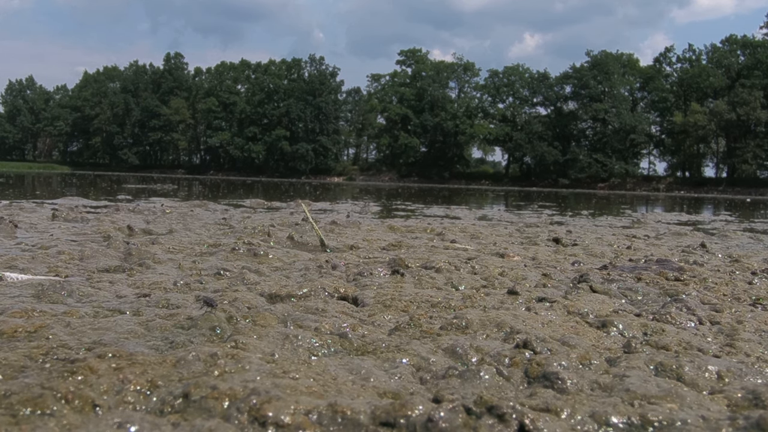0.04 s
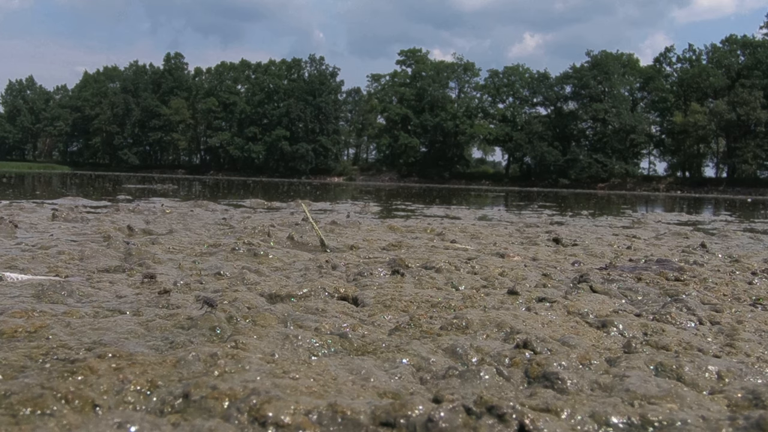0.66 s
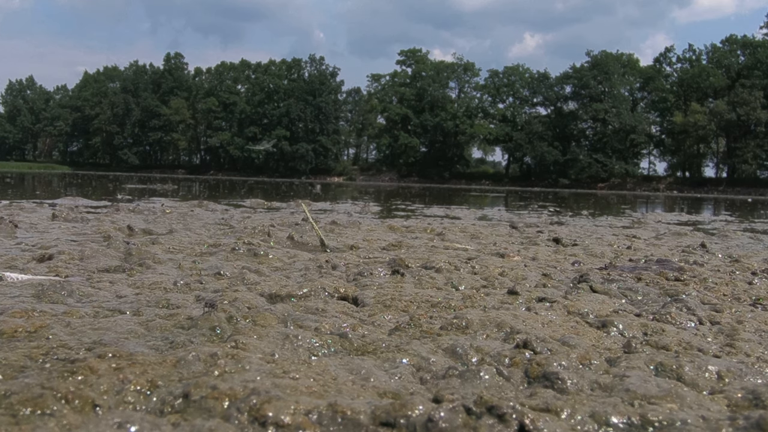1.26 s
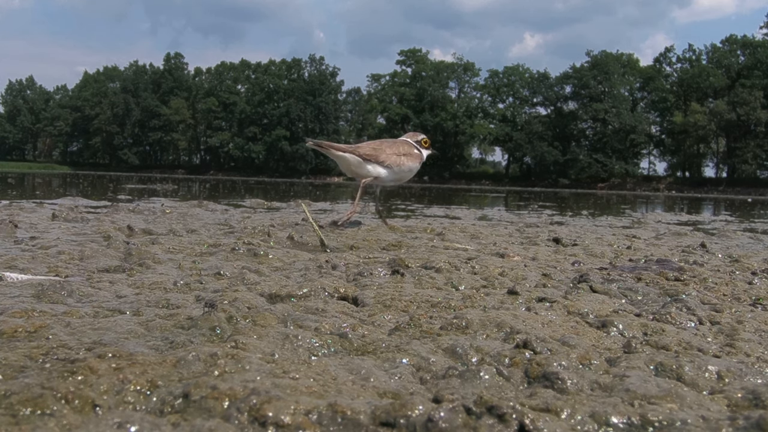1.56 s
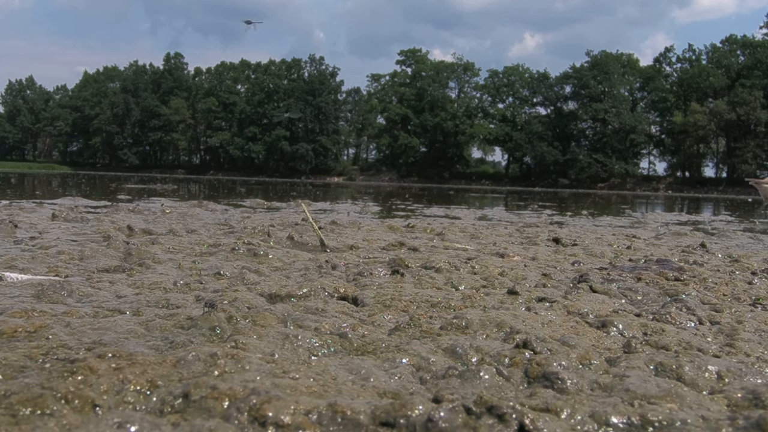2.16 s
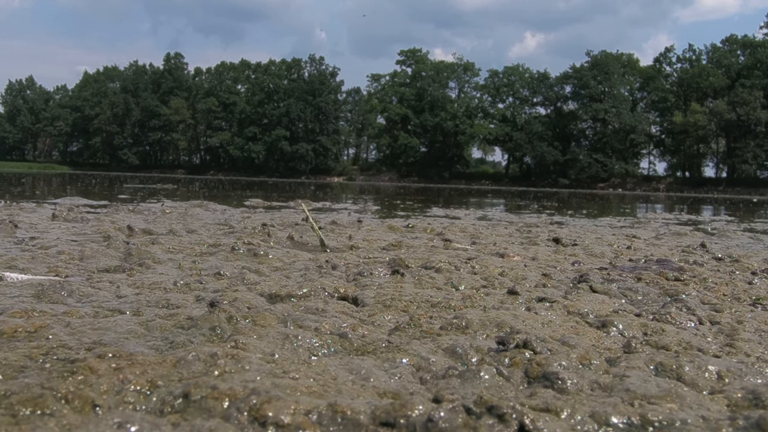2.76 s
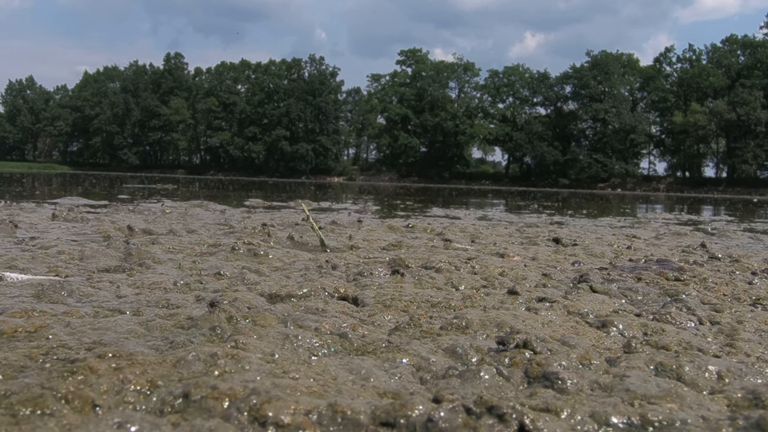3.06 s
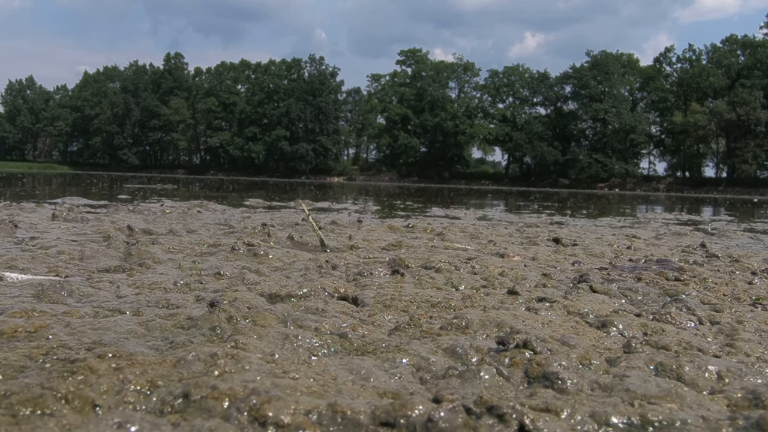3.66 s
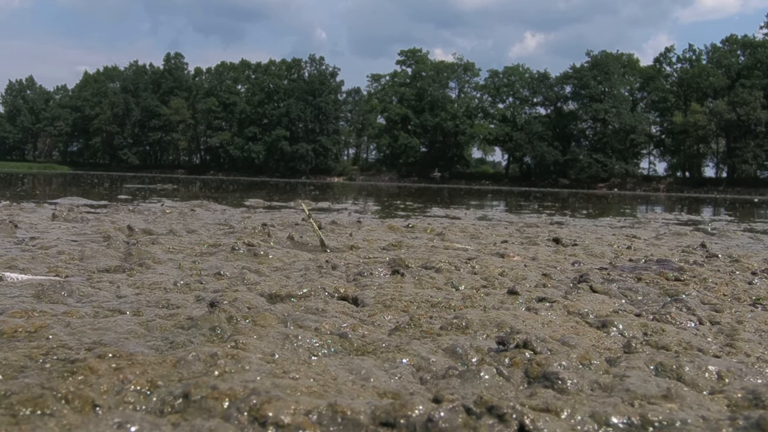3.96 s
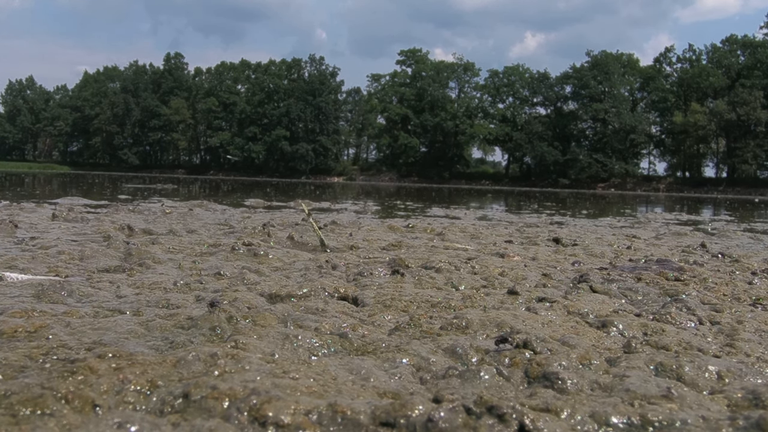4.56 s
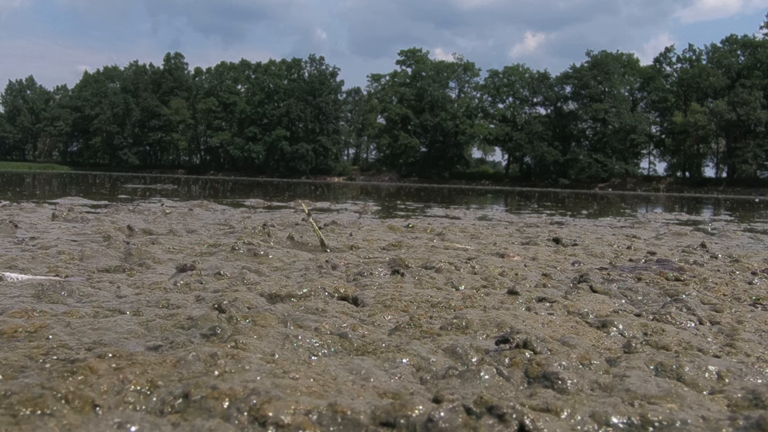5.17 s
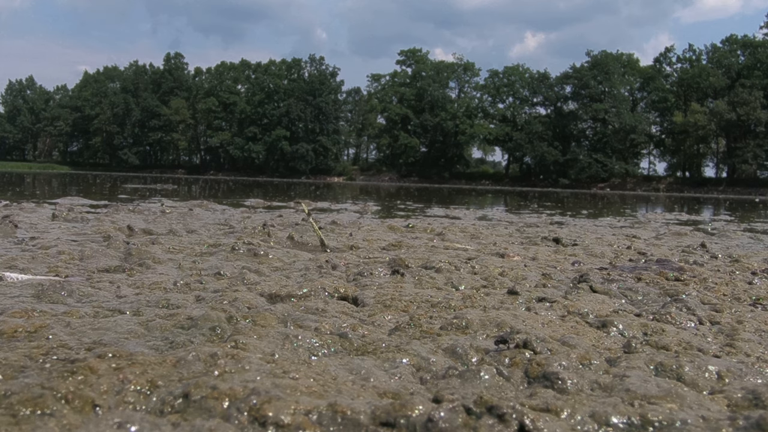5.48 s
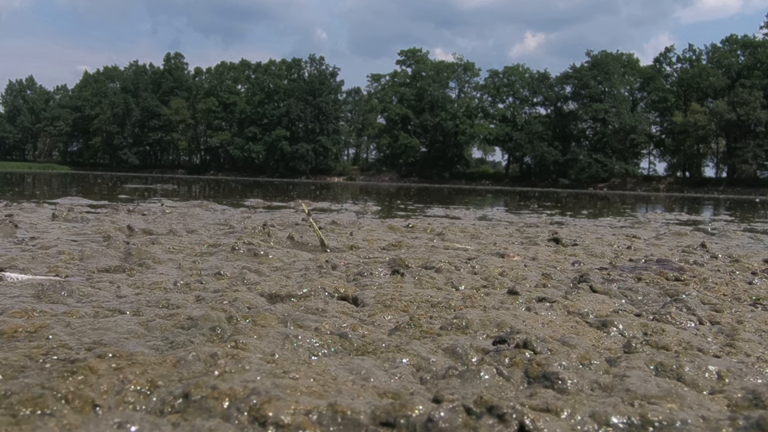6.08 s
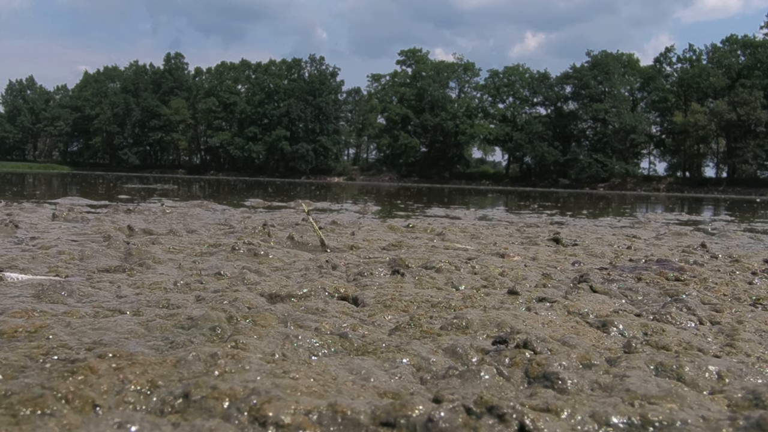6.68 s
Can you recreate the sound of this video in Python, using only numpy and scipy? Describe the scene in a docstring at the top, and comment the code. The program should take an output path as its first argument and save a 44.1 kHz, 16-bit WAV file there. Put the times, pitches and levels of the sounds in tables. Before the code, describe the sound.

Faint songbirds trill and twitter from trees across a lake, over soft air and a low distant rumble. A few tiny ticks and light scuffing come as a small bird runs over mud. Past the middle, a plover close to the microphone on the right gives one short, clear, falling whistle, far louder than everything else. A distant wader calls softly around it, and the quiet chirping carries on.

```python
"""A plover on a muddy lake shore

A plover gives one falling whistle close by on the right, a nearly pure tone shaped by its throat.
A far wader calls, and songbirds twitter in frequency-modulated tones that echo from the trees
across the water. Damped ticks and faint scuffing lie over distant rumble, soft air and equipment hum."""
import sys
import numpy as np
from scipy import signal
from scipy.fft import rfft, irfft, next_fast_len
from scipy.io import wavfile
from scipy.ndimage import uniform_filter1d, map_coordinates

SR = 44100
rng = np.random.default_rng(int(sys.argv[2]) if len(sys.argv) > 2 else 0)


def digitize_waveform(pressure):
    """Quantize a signal to 16-bit integers and store it at the path in sys.argv[1].

    Rows of a 2-D input are taken as channels; values are limited to [-1, 1].
    """
    field = np.atleast_2d(pressure).T
    bounded = np.clip(field, -1, 1)
    quanta = np.round(bounded * 32767).astype(np.int16)
    wavfile.write(sys.argv[1], SR, quanta)


N = 301203

# Noise spectra in the sum (mid) and difference (side) channels: (frequency [Hz], relative density [dB])
RUMBLE_MID_SPECTRUM = [(20, -24), (116, -21), (141, -2), (175, 0), (220, -6), (270, -17), (380, -38),
                       (900, -80)]
RUMBLE_SIDE_SPECTRUM = [(20, -26), (116, -22), (141, -3), (183, 0), (228, -4), (275, -15), (380, -34),
                        (900, -80)]
AIR_MID_SPECTRUM = [(20, 8), (110, 5.5), (255, 17), (400, 7.5), (520, -0.5), (750, 6), (1100, -2),
                    (1900, -4), (2600, -7), (5000, -6.5), (7000, -4.5), (8400, -18), (12500, -25.5),
                    (15000, -34.5)]
AIR_SIDE_SPECTRUM = [(20, 2.5), (110, 8), (260, 23.5), (400, 9.5), (520, 8), (800, 16.5), (1100, 7),
                     (1450, 5.5), (2600, -8), (5000, -13), (7000, -3.5), (8400, -19), (12500, -24),
                     (15000, -38)]
# Partials of the hum: (frequency [Hz], level [dB])
HUM_PARTIALS = [(59.94, -75), (179.8, -67.5)]
# Spectral envelope of the buzz: (frequency [Hz], line level [dB])
BUZZ_ENVELOPE = [(5300, -112), (5800, -94), (6200, -124.5), (6700, -88.5), (7100, -95.5), (7600, -104)]
# Spectrum of scuffed mud: (frequency [Hz], relative density [dB])
SCUFF_SPECTRUM = [(300, -13), (600, -8.5), (1400, 1.5), (2500, -9), (6000, -2.5), (9000, -20), (13000, -33),
                  (15000, -29.5)]
# Songbird trills: (time [s], duration [s], start pitch [Hz], middle pitch [Hz], end pitch [Hz],
# level [dB], warble depth [Hz], left minus right [dB])
TRILL_NOTES = [(0.149, .425, 5140, 3660, 3090, -68.5, 145, 4.5),
               (.685, 0.35, 5000, 3790, 2810, -69, 145, 5), (1.084, 0.12, 4270, 4400, 4680, -75, 110, 2),
               (1.188, .096, 3090, 3320, 3470, -74, 250, 1), (1.276, .14, 3620, 2890, 2870, -69.5, 300, -1),
               (1.993, 0.076, 4600, 3500, 3200, -71.5, 395, 2),
               (2.101, .11, 3350, 2750, 2670, -73.5, 250, 1), (2.35, .074, 5800, 4860, 4340, -70.5, 450, 2),
               (2.63, 0.12, 4570, 3750, 2900, -72.5, 240, 1.5),
               (3.06, 0.089, 3910, 3170, 2610, -77, 220, -1),
               (3.483, .14, 5700, 4430, 4030, -70.5, 330, -2),
               (3.857, 0.054, 4000, 3550, 3420, -76.5, 200, -4),
               (5.231, .11, 4500, 3570, 2740, -76.5, 220, 1), (5.594, 0.091, 4290, 3690, 2870, -71, 240, 0),
               (6.574, .17, 4350, 3190, 2430, -73.5, 180, 0)]
# Ticks, soft knocks and one short high chip: (time [s], level [dB], centre frequency [Hz], width [octaves])
TICK_EVENTS = [(.588, -55.5, 400, 0.7), (0.5998, -46.5, 3170, 0.77), (.6, -57, 296, 0.48),
               (0.6032, -52.5, 1550, 0.39), (1.2644, -56, 2050, 0.57), (1.6965, -51, 3900, .32),
               (1.7074, -56, 3500, 0.29), (1.76, -49, 5240, .47), (1.9195, -47.5, 6660, 0.16),
               (4.328, -56, 1100, .75), (4.7446, -51.5, 5200, 0.56)]
# Bouts of hoarse chirps: (centre of first chirp [s], end of bout [s], first level [dB])
CHIRP_BOUTS = [(1.322, 2.23, -67.5), (4.644, 5.38, -66.5)]
# Songbird slides: (time [s], duration [s], start pitch [Hz], end pitch [Hz], level [dB])
SLIDE_NOTES = [(1.297, .014, 4550, 5260, -66), (1.513, 0.028, 4070, 5260, -64.5),
               (1.564, 0.072, 5900, 3020, -66), (1.71, 0.014, 3700, 3100, -70),
               (1.73, 0.0096, 4250, 4500, -56.5), (1.744, 0.01, 4700, 5400, -62),
               (1.779, .044, 6210, 4050, -58.5), (1.826, .032, 3920, 3060, -66.5),
               (3.455, 0.024, 4360, 4520, -71), (3.767, .029, 5600, 5100, -74),
               (3.837, 0.038, 6530, 5420, -74.5), (4.868, 0.028, 6500, 5570, -67.5)]
# One bird's peeps: (time [s], level [dB])
PEEP_NOTES = [(2.755, -68.5), (3.11, -69.5), (4.157, -73.5), (5.175, -69), (5.546, -74.5)]
# Far wader: (time [s], duration [s], start pitch [Hz], middle pitch [Hz], end pitch [Hz], level [dB])
WADER_NOTES = [(4.041, 0.087, 2030, 2000, 1820, -68), (4.19, 0.093, 2380, 2330, 2270, -73),
               (4.813, 0.12, 1980, 2140, 2010, -66.5), (4.895, 0.09, 2050, 1830, 2070, -63.5),
               (4.981, 0.16, 2100, 2253, 2180, -72), (5.23, 0.079, 1720, 2025, 1860, -65)]
# Catches of the plover's voice before it whistles: (time [s], duration [s], pitch [Hz], level [dB])
VOICE_CATCHES = [(4.3456, 0.002, 2110, -35.5), (4.3548, 0.0052, 2540, -27.5)]
# The whistle falters, holds, then sinks as it grows louder: (time [s], pitch [Hz], level [dB])
WHISTLE_CONTOUR = [(4.3637, 2413, -27), (4.3715, 2518, -33), (4.375, 2386, -28.3), (4.422, 2370, -28),
                   (4.452, 2263, -25), (4.497, 2058, -24.5), (4.53, 1952, -24.5), (4.552, 1885, -26),
                   (4.56, 1640, -32)]
# Response of the plover's throat, with a resonance near 7 kHz: (frequency [Hz], gain [dB])
THROAT_RESPONSE = [(700, -18), (1100, -2), (1400, 0), (2550, 0), (3750, -28), (4100, -21), (4750, -11),
                   (5800, -26), (6500, -11), (7200, -4), (8600, -16), (9400, -29), (12200, -23),
                   (14500, -32)]
# Air hissing along with the whistle: (frequency [Hz], relative density [dB])
BREATH_SPECTRUM = [(1200, -24), (2500, -15), (2820, 2), (3150, -24), (4500, -25), (5500, -25.5),
                   (6300, -17), (8000, -43), (14000, -52)]
# Response of the whistle on the left, relative to the right, with a notch where a ground reflection interferes:
# (frequency [Hz], gain [dB])
LEFT_RESPONSE = [(1400, -7), (1860, -10), (1940, -14), (2000, -23), (2170, -15), (2400, -10.5), (4700, -7),
                 (6000, 5), (7200, 0), (8000, -4), (11000, 1)]
# Later arrival of the whistle on the left: (frequency [Hz], phase delay [s])
LEFT_DELAY = [(1950, .00044), (2050, .00032), (2400, .00026), (4000, .000205)]


def amp(db):
    """Amplitude grows tenfold for every 20 dB."""
    return 10 ** (np.asarray(db) / 20)


def unit(x):
    """Normalisation to an rms of 1."""
    return x / np.sqrt(np.mean(x ** 2) + 1e-20)


def along(points, hz):
    """Interpolation of (frequency, value) points on a logarithmic frequency axis."""
    frequencies, values = np.transpose(points)
    return np.interp(np.log(hz + 1), np.log(frequencies + 1), values)


def wobble(rate, size=N):
    """Smooth random modulation: a spline through `rate` Gaussian values a second."""
    knots = rng.standard_normal(int(size * rate / SR) + 4)
    return map_coordinates(knots, [np.arange(size) * rate / SR])


def filtered(x, response):
    """Linear filtering: the spectrum is multiplied by a frequency response."""
    size = x.shape[-1]
    padded = next_fast_len(size + 8192)
    return irfft(rfft(x, padded) * response(np.fft.rfftfreq(padded, 1 / SR)), padded)[..., :size]


def phase_of(hz):
    """Phase is the time integral of frequency."""
    return 2 * np.pi * np.cumsum(hz) / SR


def add(track, s, sound, pan_db=0):
    """Superposition at time s, with the left channel pan_db above the right."""
    start = max(0, round(s * SR))
    part = (sound * amp([[pan_db / 2], [-pan_db / 2]]))[:, :N - start]
    track[:, start:start + part.shape[1]] += part


def coloured_noise(spectrum):
    """White noise takes on the spectrum of its filter."""
    return filtered(rng.standard_normal(N), lambda hz: amp(along(spectrum, hz)))


def stereo_noise(mid_spectrum, side_spectrum):
    """Mid-side stereo from two independent noises, scaled so that the mid has rms 1."""
    mid, side = coloured_noise(mid_spectrum), coloured_noise(side_spectrum)
    return np.array([mid + side, mid - side]) / np.std(mid)


def note(length, pitches, warble_hz, warble_rate, flutter_db, edge):
    """Frequency modulation, warble_hz deep, of a tone arching through three pitches."""
    size = int(length * SR)
    progress = np.linspace(0, 1, size)
    cycle = phase_of(warble_rate * (1 + .07 * wobble(30, size)))
    rasp = (28 + .45 * warble_hz) * wobble(500, size)
    arch = np.polyval(np.polyfit([0, .5, 1], pitches, 2), progress)
    pitch = arch + 0.9 * warble_hz * np.sin(cycle) + rasp
    envelope = np.sin(np.pi / 2 * np.clip(np.minimum(progress, 1 - progress) / edge, 0, 1))
    # a deep warble breaks the tone into pulses, loudest on each downstroke
    pulsing_db = -5.5 * np.tanh((warble_hz / 130) ** 2) * np.cos(cycle)
    return unit(envelope * amp(pulsing_db + flutter_db * wobble(70, size)) * np.sin(phase_of(pitch)))


def tree_echo(x, t60, build_s):
    """Diffuse reflection from the trees: convolution with noise that builds, then decays."""
    t = np.arange(SR) / SR
    tail = rng.standard_normal((2, SR)) * amp(-60 * t / t60) * (1 - np.exp(-(t / build_s) ** 2))
    return signal.fftconvolve(x, tail / np.linalg.norm(tail[0]), axes=1)[:, :N]


def distant_rumble():
    """Low-frequency noise under slow amplitude modulation: it wavers, and swells once."""
    start_s, rise_s, hold_s, fall_s = 5.91, 0.2, 0.47, 0.46
    swell_db = np.interp(np.arange(N) / SR, np.cumsum([start_s, rise_s, hold_s, fall_s]), [0, 7.5, 7.5, 0])
    gain = amp(-61 + swell_db + 1.5 * wobble(8))
    return gain * stereo_noise(RUMBLE_MID_SPECTRUM, RUMBLE_SIDE_SPECTRUM)


def soft_air():
    """Broadband noise, nearly stationary in level."""
    return amp(-65 + .4 * wobble(3)) * stereo_noise(AIR_MID_SPECTRUM, AIR_SIDE_SPECTRUM)


def equipment_hum():
    """A line spectrum: two wavering low partials and a thin buzz of high harmonics."""
    hum = sum(amp(db + 2.16 * wobble(6.9)) * unit(np.sin(phase_of(hz + 0.6 * wobble(4.05))))
              for hz, db in HUM_PARTIALS)
    t, harmonics_hz = np.arange(N) / SR, 119.88 * np.arange(46, 63)
    buzz = sum(amp(along(BUZZ_ENVELOPE, hz)) * unit(np.sin(2 * np.pi * (hz * t + rng.random())))
               for hz in harmonics_hz)
    return hum + buzz


def mud_scuffing():
    """Rapid random modulation makes noise crackle; it peaks as the plover runs past on the mud."""
    peak_s, peak_db, floor_db = 1.22, -64.5, -75.5
    rise_db_per_s, fade_db_per_s = 55, 5.5
    since_peak = np.arange(N) / SR - peak_s
    drop_db = np.maximum(-since_peak * rise_db_per_s, since_peak * fade_db_per_s)
    grains = amp(3 * wobble(45) + 3 * wobble(700))
    crackle = unit(grains * stereo_noise(SCUFF_SPECTRUM, SCUFF_SPECTRUM))
    return amp(np.maximum(peak_db - drop_db, floor_db)) * crackle


def stray_twitter(count=50):
    """From deep in the wood, the reverberant sound of random chirps outweighs the direct sound."""
    track = np.zeros((2, N))
    for when, height, slope, size in rng.random((count, 4)):
        hz = 3200 + 2500 * height
        pitches = [hz * (1 + .15 * slope), hz, hz * .95]
        chirp = note(.03 + .04 * size, pitches, warble_hz=120, warble_rate=60, flutter_db=2, edge=.3)
        add(track, when * N / SR, amp(-79 + 4 * size) * chirp)
    return .5 * track + tree_echo(track, t60=0.13, build_s=0.0068)


def trills(fade_db=0.8, near_db=-66.5):
    """Deep modulation makes notes buzz. Returns the direct sound and the share sent to the trees."""
    direct, to_trees = np.zeros((2, 2, N))
    for s, length, *pitches, db, warble_hz, pan_db in TRILL_NOTES:
        trill = note(length, pitches, warble_hz, warble_rate=50, flutter_db=1.1, edge=.1)
        trill *= amp(db + fade_db * np.linspace(.5, -.5, len(trill)))
        echo_db = -6.5 + .5 * (near_db - db)  # fainter birds are further off, so more reverberant
        add(direct, s, trill, pan_db)
        add(to_trees, s, amp(echo_db) * trill, pan_db)
    return direct, to_trees


def water_reflection(x, gain=.35, delay_s=.0009):
    """Interference of direct and reflected paths: a gliding note swells and dips."""
    return filtered(x, lambda hz: 1 + gain * np.exp(-2j * np.pi * hz * delay_s))


def ticks(decay_cycles=62, lead_samples=200):
    """Damped bursts of band noise: each falls 60 dB in decay_cycles, so low ones last longer."""
    track, t = np.zeros((2, N)), np.arange(SR // 10) / SR
    for s, db, centre_hz, octaves in TICK_EVENTS:
        def band(hz):
            bell = np.exp(-.5 * (np.log2((hz + 1) / centre_hz) / octaves) ** 2)
            return bell / np.sqrt(1 + hz / centre_hz + (hz / 7000) ** 7)

        t60 = decay_cycles / centre_hz
        noise = rng.standard_normal(len(t)) + 0.64 * rng.standard_normal((2, len(t)))
        decaying = np.pad(noise * amp(-60 * t / t60), ((0, 0), (lead_samples, 0)))
        burst = filtered(decaying, band) / np.std(filtered(noise, band))
        add(track, s - lead_samples / SR, amp(db) * burst, pan_db=2.5)
    return track


def hoarse_chirps(period_s=.166, length_s=.17, width_hz=250):
    """Narrow-band noise has a raspy pitch; through a bout each chirp is higher and louder."""
    track, size = np.zeros((2, N)), int(length_s * SR)
    for first, end, db in CHIRP_BOUTS:
        for k, s in enumerate(np.arange(first, end, period_s)):
            centre_hz = 4460 + 42 * k
            noise = rng.standard_normal(size)
            rasp = unit(filtered(noise, lambda hz: 1 / (1 + ((hz - centre_hz) / width_hz) ** 2)))
            add(track, s - length_s / 2, amp(db + 0.83 * k) * np.hanning(size) * rasp, pan_db=1.5)
    return track


def slides():
    """Quick frequency sweeps, up or down, sagging midway below the geometric mean pitch."""
    track = np.zeros((2, N))
    for s, length, start_hz, end_hz, db in SLIDE_NOTES:
        pitches = [start_hz, 0.96 * np.sqrt(start_hz * end_hz), end_hz]
        slide = note(length, pitches, warble_hz=30, warble_rate=65, flutter_db=2, edge=.1)
        add(track, s, amp(db) * slide, pan_db=6)
    return track


def chip_run(count=4, start_s=2.095, period_s=.061):
    """Periodic downward sweeps, high in pitch, fading slightly on the right."""
    track = np.zeros((2, N))
    for k in range(count):
        chip = note(0.0414, [5770, 5360, 5130], warble_hz=200, warble_rate=51, flutter_db=0, edge=.15)
        add(track, start_s + k * period_s, amp(-70 - 0.2 * k) * chip, pan_db=-7)
    return track


def peeps():
    """Shallow modulation leaves a plain tone, which dips in pitch and levels out."""
    track = np.zeros((2, N))
    for s, db in PEEP_NOTES:
        peep = note(0.0947, [4380, 4110, 4140], warble_hz=35, warble_rate=50, flutter_db=3.5, edge=.25)
        add(track, s, amp(db) * peep, pan_db=-4.5)
    return track


def far_wader():
    """Reverberation blurs mellow, slurred whistles from the right."""
    track = np.zeros((2, N))
    for s, length, *pitches, db in WADER_NOTES:
        whistle = note(length, pitches, warble_hz=25, warble_rate=60, flutter_db=2.5, edge=.2)
        add(track, s, amp(db) * whistle, pan_db=-11)
    track[0] *= -1  # at this pitch the two channels are in antiphase
    return track + amp(-8) * tree_echo(track, t60=.45, build_s=.025)


def plover_voice():
    """Source and filter: the weak overtones of a whistle slide through the throat's resonances."""
    t = np.arange(N) / SR
    times, contour_hz, contour_db = np.transpose(WHISTLE_CONTOUR)
    # at the end the voice cracks to a lower, harsher note that plunges
    crack_s, crack_hz, plunge_hz_per_s, fade_db_per_s = 0.017, 1417, 34000, 405
    since_crack = t - times[-1]
    voiced, cracked = (t > times[0]) & (since_crack < crack_s), since_crack > 0
    plunge_s = np.clip(since_crack, 0, crack_s)
    pitch = np.where(cracked, crack_hz - plunge_hz_per_s * plunge_s, np.interp(t, times, contour_hz))
    level_db = np.where(cracked, -28 - fade_db_per_s * plunge_s, np.interp(t, times, contour_db))
    overtone_db = np.where(cracked, -10.5 + 1100 * plunge_s, -1)
    for s, length, hz, db in VOICE_CATCHES:
        catch = (t > s) & (t < s + length)
        pitch[catch], voiced[catch] = hz, True
        level_db[catch] = db - 2400 * (t[catch] - s)
    # the voice needs about a millisecond to start, stop or jump
    pitch = uniform_filter1d(pitch, size=40)
    envelope = voiced * amp(level_db + .15 * wobble(220))
    envelope = uniform_filter1d(uniform_filter1d(envelope, size=40), size=30)
    phase = phase_of(pitch * (1 + 0.0031 * wobble(400)))
    partials = [amp(along(THROAT_RESPONSE, k * pitch)) * np.sin(k * phase) / k ** 2 for k in range(1, 8)]
    overtones = amp(uniform_filter1d(overtone_db, size=80)) * sum(partials[1:])
    breath = amp(-38.5) * unit(coloured_noise(BREATH_SPECTRUM))
    return np.sqrt(2) * envelope * (partials[0] + overtones + breath)


def near_plover():
    """Level and time differences place the plover on the right: on the left a ground reflection interferes, and
    the sound arrives late."""
    def left_path(hz):
        return amp(along(LEFT_RESPONSE, hz)) * np.exp(-2j * np.pi * hz * along(LEFT_DELAY, hz))

    right = plover_voice()
    echo = tree_echo(np.array([right, right]), t60=0.61, build_s=0.049)
    return np.array([filtered(right, left_path), right]) + amp(-52.5) * echo


def pip_run(count=7, start_s=6.003, period_s=.0572):
    """Periodic pairs of tones, high then low, grow louder over a long thin whistle."""
    track = np.zeros((2, N))
    for k in range(count):
        s, db = start_s + k * period_s, -69 + 0.63 * k
        high = note(.027, [4200, 4420, 4350], warble_hz=95, warble_rate=75, flutter_db=3, edge=.25)
        low = note(.028, [3650, 3450, 3650], warble_hz=120, warble_rate=70, flutter_db=4, edge=.25)
        add(track, s, amp(db) * high, pan_db=4.5)
        add(track, s + 0.022, amp(db - 9.5) * low, pan_db=-2)
    thin = note(.78, [4860, 4800, 4800], warble_hz=12, warble_rate=50, flutter_db=2, edge=.1)
    add(track, 5.83, amp(-76.5) * thin, pan_db=-1)
    return track


def songbirds():
    """Each kind of song has its own ratio of direct to reverberant sound."""
    trilling, to_trees = trills()
    sliding, peeping = slides(), peeps()
    echo = tree_echo(to_trees + amp(-9) * sliding + amp(-1.5) * peeping, t60=.55, build_s=0.018)
    runs = chip_run() + pip_run() + hoarse_chirps()
    run_echo = amp(-5) * tree_echo(runs, t60=0.48, build_s=0.022)
    return water_reflection(trilling) + sliding + peeping + echo + runs + run_echo


def scene():
    """Superposition: the sound pressures of all sources on the shore add, in stereo."""
    birds = near_plover() + far_wader() + songbirds() + stray_twitter()
    return birds + ticks() + mud_scuffing() + distant_rumble() + soft_air() + equipment_hum()


def record(dry):
    """Band limiting: an ideal low-pass filter removes everything above 15 kHz."""
    return filtered(dry, lambda hz: hz < 15000)


dry = scene()
out = record(dry)
digitize_waveform(out)
```